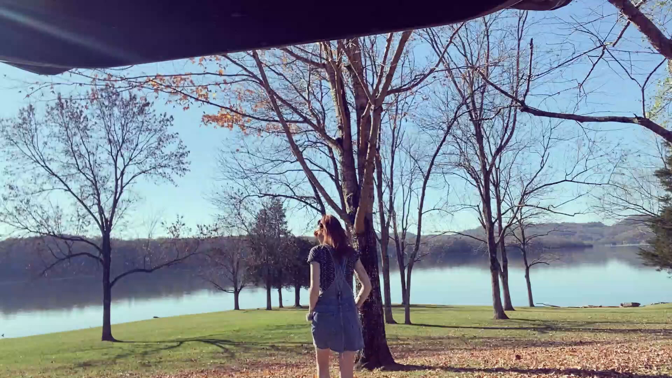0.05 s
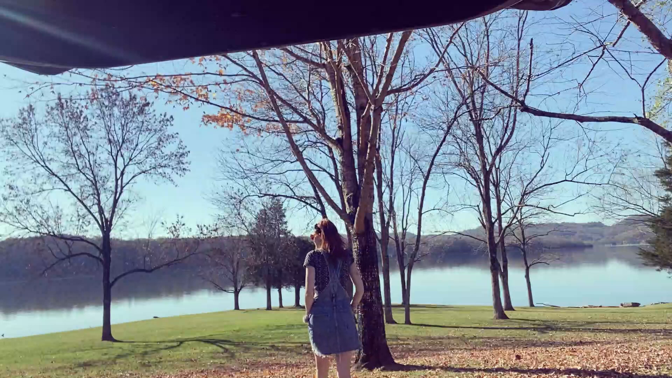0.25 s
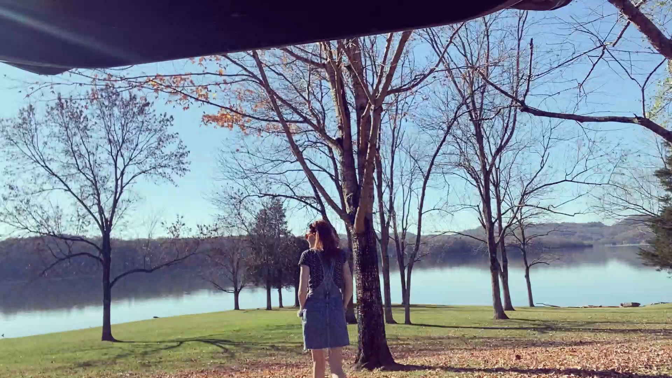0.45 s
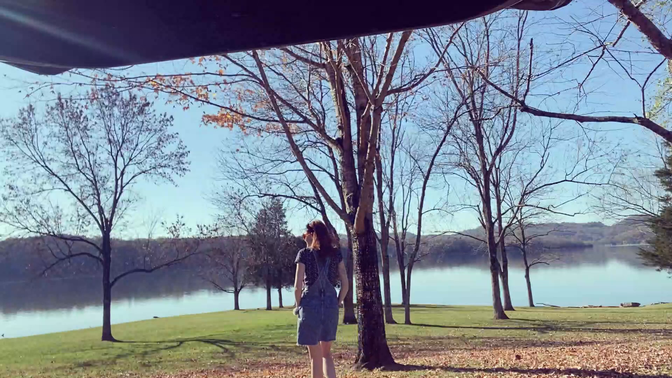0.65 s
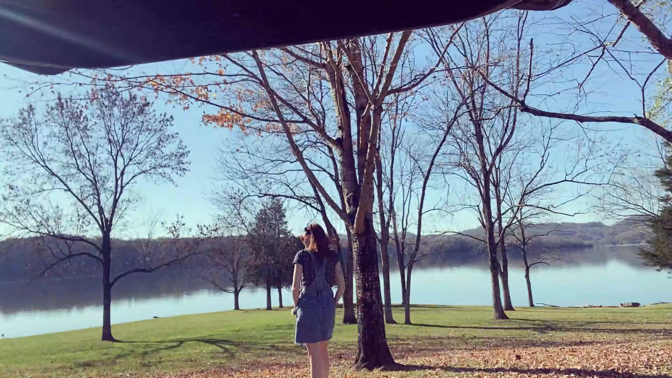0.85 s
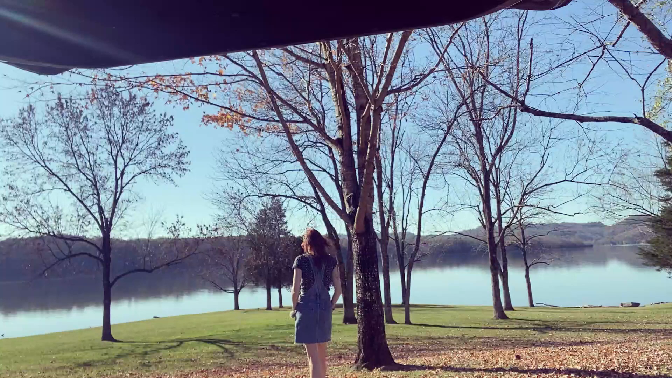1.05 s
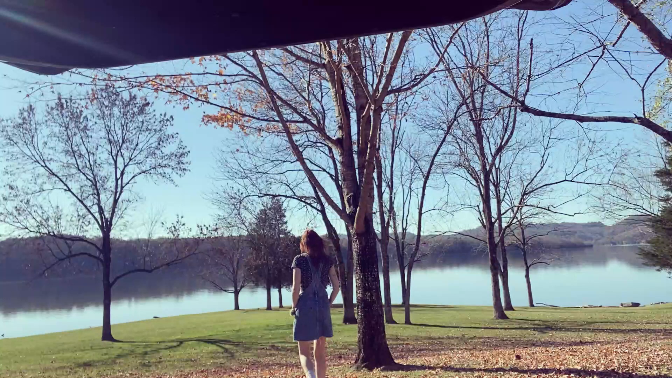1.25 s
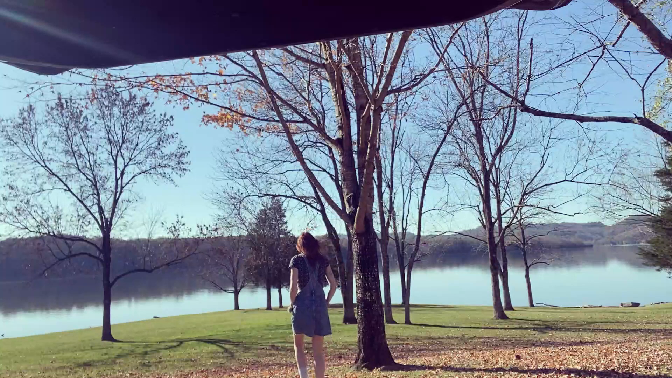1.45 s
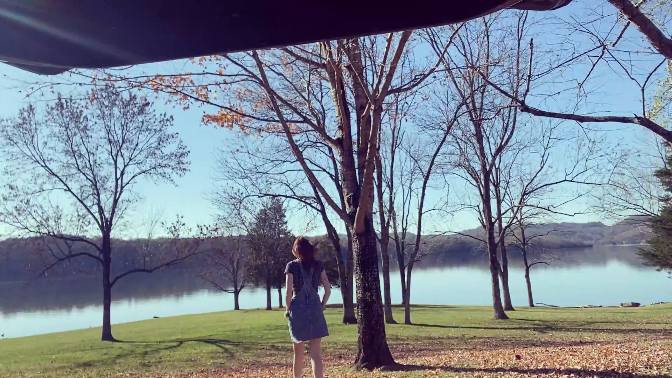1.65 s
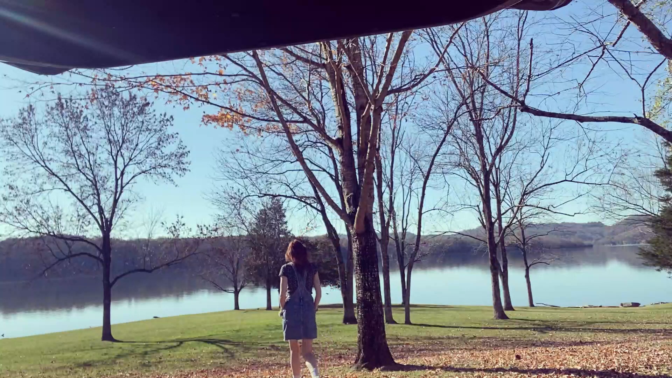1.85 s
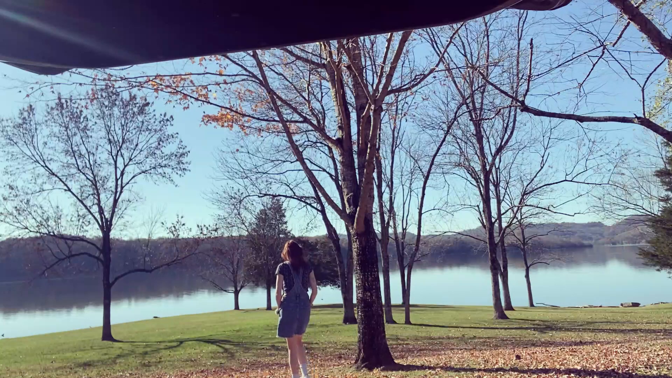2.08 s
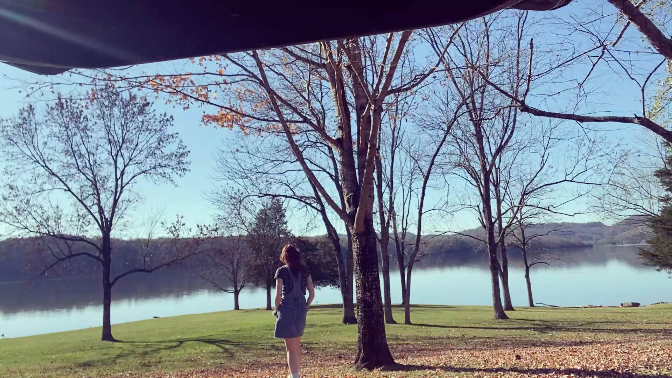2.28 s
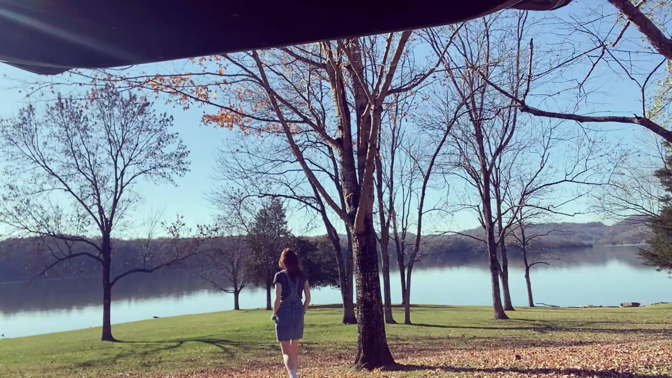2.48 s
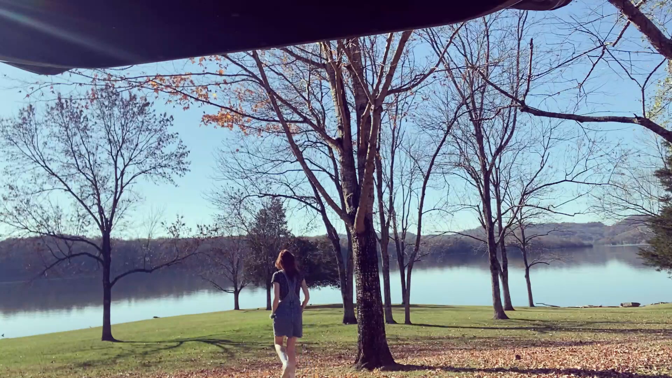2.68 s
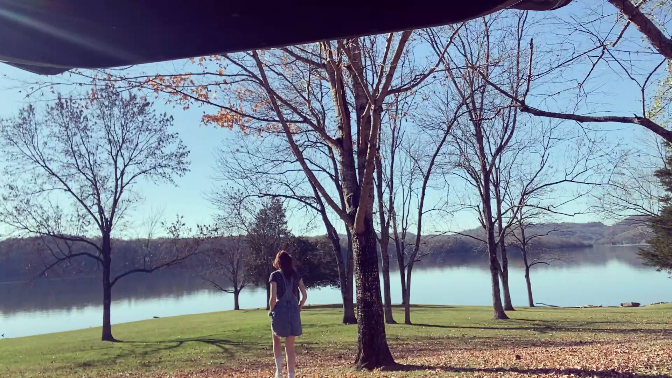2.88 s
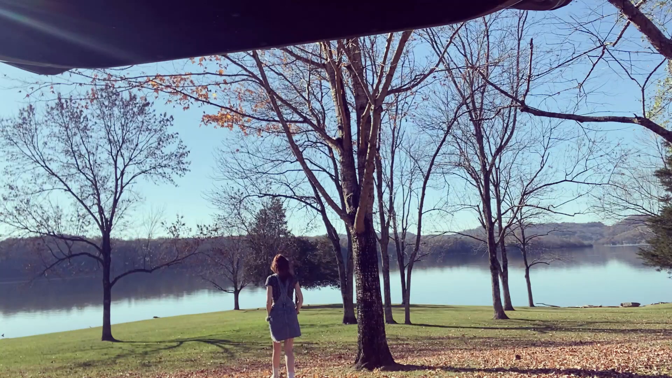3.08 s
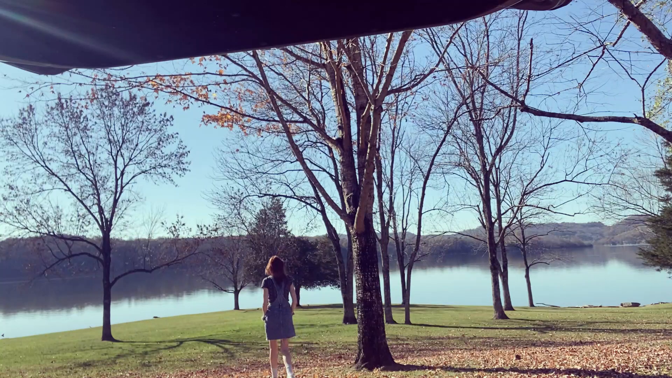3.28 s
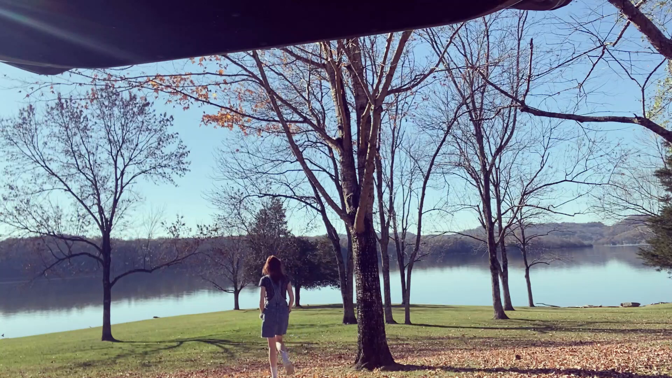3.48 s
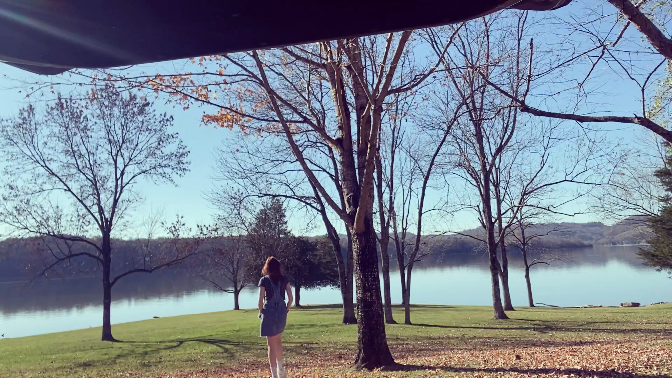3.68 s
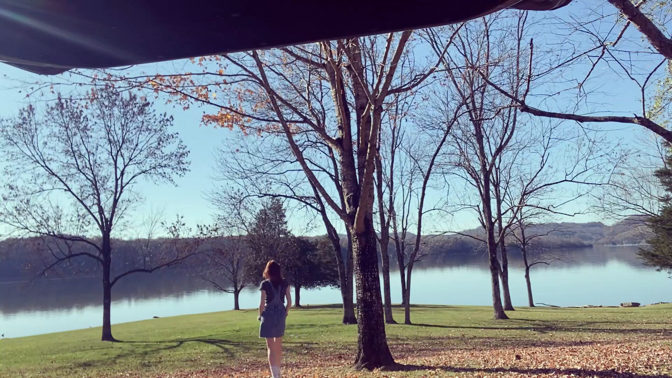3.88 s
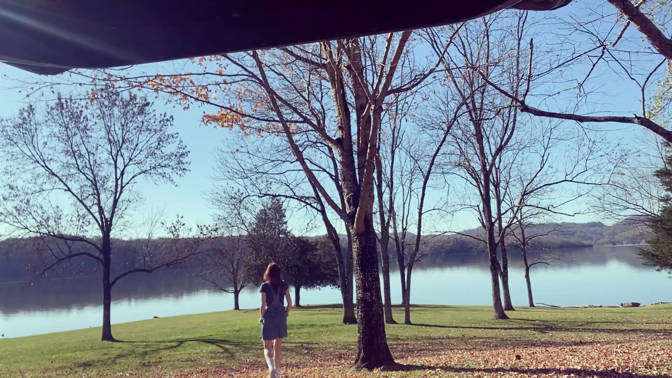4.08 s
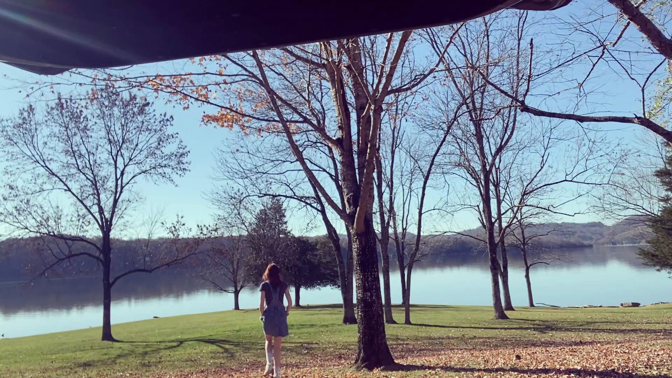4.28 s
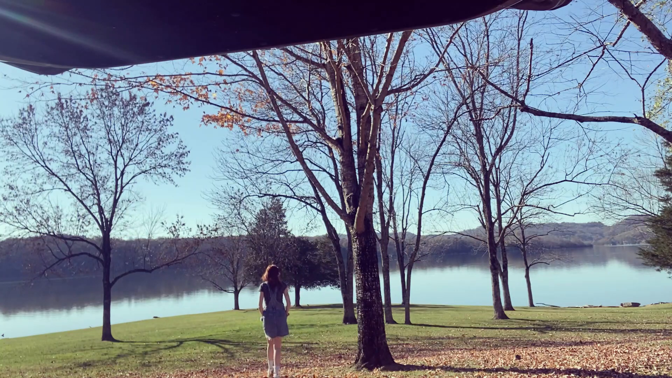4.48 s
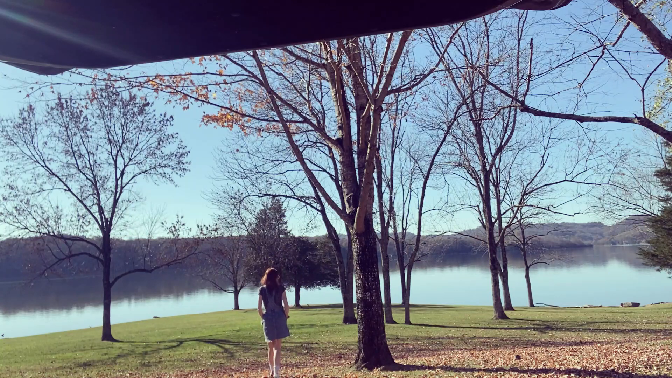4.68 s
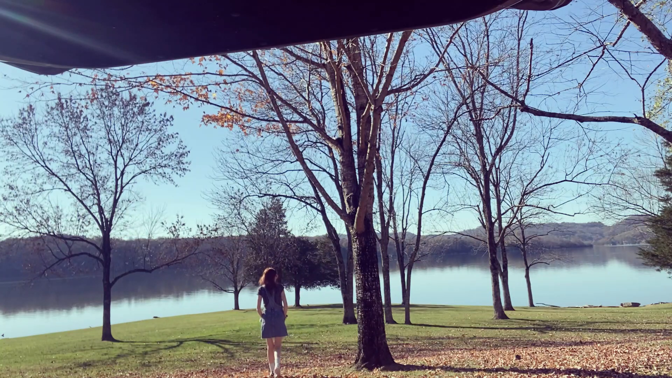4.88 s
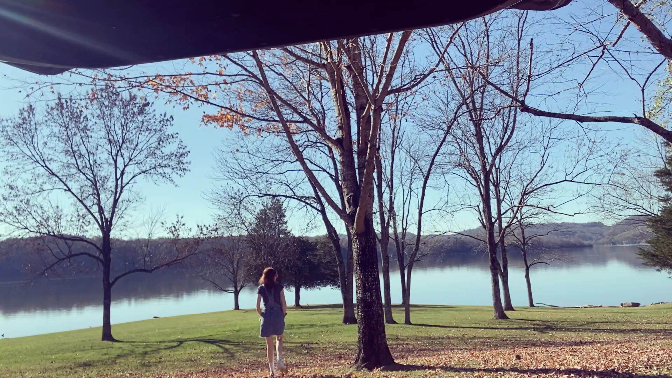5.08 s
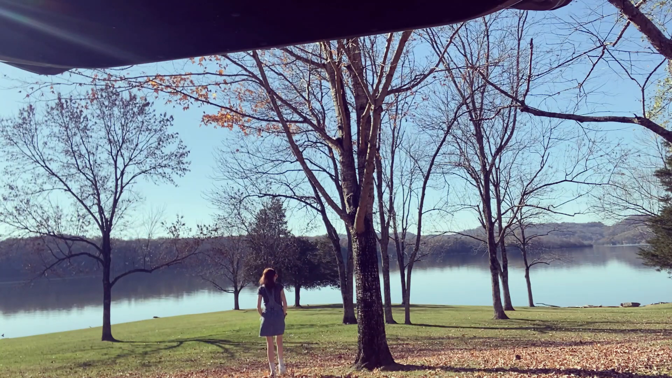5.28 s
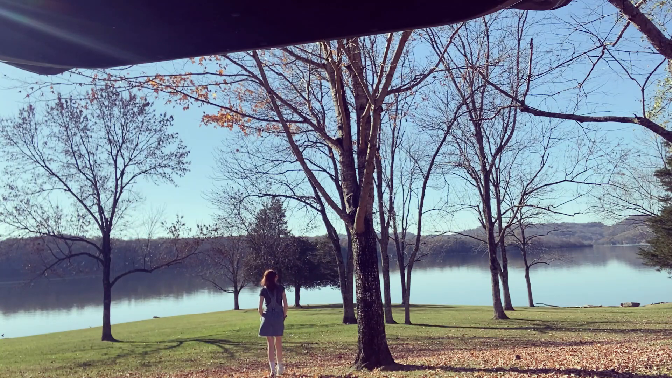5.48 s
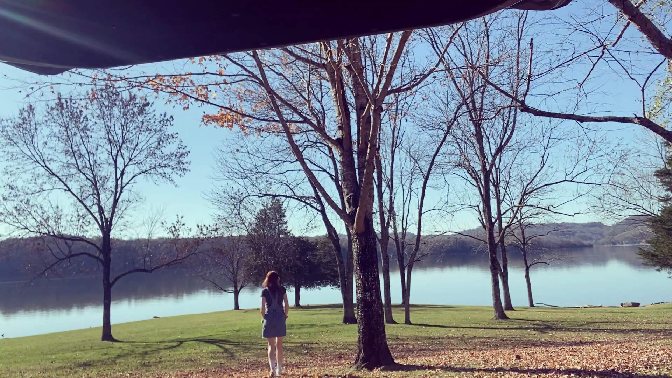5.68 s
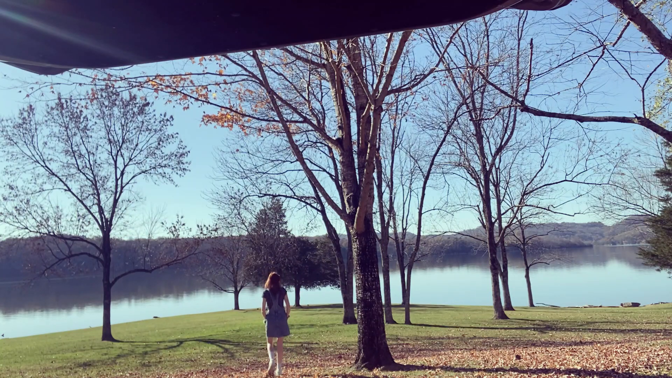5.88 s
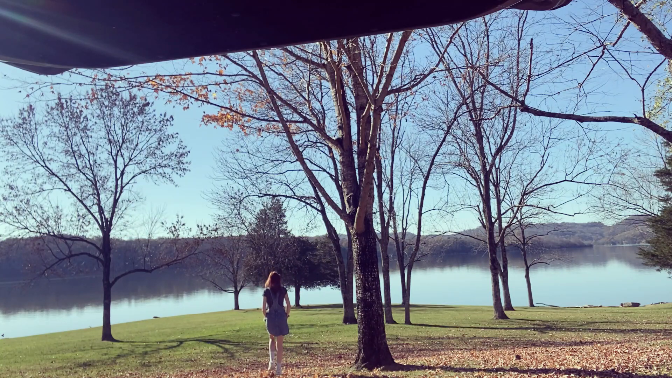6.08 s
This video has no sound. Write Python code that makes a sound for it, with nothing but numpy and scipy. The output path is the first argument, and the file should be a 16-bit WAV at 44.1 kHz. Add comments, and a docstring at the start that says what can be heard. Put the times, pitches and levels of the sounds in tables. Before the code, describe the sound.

A quiet open park by a lake, heard from a stationary phone in a car's open boot. A faint wavering low hum, soft rumble and barely perceptible rustle run throughout. A person walks away through dry leaves and grass. The first footfall bursts in at about 0.1 s, close, bright and crackly with crisp snaps, settling by 0.6. The second runs from 0.8 to 1.5, crunching most around 1.1. The third, 1.55 to 2.05, is strong and dense, with the sharpest snap near 1.75. Softer crunches follow from 2.1 to 2.9, 2.9 to 3.7 and 3.8 to 4.4, each swelling with weight and trailing into rustle. The seventh, 4.4 to 5.3, is thin and distant; the eighth, 5.55 to 6.1, is a faint scuff with a small snap near 5.95. Tiny hatch reflections give a slightly hollow colour that drifts as the walker recedes.

```python
"""Someone walks away through dry leaves and grass, heard by a phone in the open boot of a car.
Throughout: far hum (wavering tone and noise), low rumble and faint rustle (coloured noise).
From the start: eight footfalls of dense crackle (tiny decaying sines on noise), with single snaps (noise bursts).
In each footfall body swells as the foot takes the load; the raised hatch and boot edge add short echoes.
Towards the end the leaf colour has glided from near to far and the echo comb has drifted up."""
import sys
import numpy as np
from scipy import signal
from scipy.fft import rfft, irfft, next_fast_len
from scipy.io import wavfile
from scipy.ndimage import uniform_filter1d, map_coordinates

SR = 44100
rng = np.random.default_rng(int(sys.argv[2]) if len(sys.argv) > 2 else 0)


def generate_wav(sig):
    """Save sig (samples, or channels by samples) to the path in sys.argv[1] as 16-bit PCM at SR."""
    pcm = np.round(np.clip(np.atleast_2d(sig).T, -1, 1) * 32767).astype(np.int16)
    wavfile.write(sys.argv[1], SR, pcm)


N = 270896

# hum and rumble gains: time_s, hum_db, rumble_db
BACKGROUND_GAINS = [(0.0, -76, -73), (0.12, -57.5, -62), (0.26, -58, -67.5), (1.14, -62.5, -67),
                    (1.42, -69.5, -70.5), (1.61, -57.5, -60.5), (2.82, -65, -66.5), (3.18, -62.5, -61.5),
                    (3.81, -70.5, -65.5), (3.9, -60.5, -60.5), (5.56, -59, -67.5), (5.97, -58.5, -65),
                    (6.0, -50, -66), (6.14, -63, -70.5)]
# spectra, relative, scaled to rms 1 before the gain: freq_hz, density_db
HUM_SPECTRUM = [(20, -34), (45, -9), (64, 2.5), (90, -9), (130, -23), (200, -63)]
RUMBLE_SPECTRUM = [(20, -39), (60, -4.5), (150, -1), (274, -12.5), (500, -34.5), (700, -77)]
RUSTLE_SPECTRUM = [(200, -36), (300, 5), (700, -3.5), (1800, -8.5), (3700, -5.5), (6500, -6), (9000, -3),
                   (12000, -12.5), (15500, -7)]

# crackle gain, one list per footfall from landing to settling: time_s, crackle_db
FOOTFALL_CRACKLE = [
    [(.066, -85), (.076, -36), (.105, -49), (.17, -39), (.22, -57), (.26, -53.5), (.29, -49), (.32, -50.5),
     (.385, -46), (.42, -62), (.49, -54), (.58, -59.5), (.66, -77)],
    [(.76, -69), (.78, -58), (.83, -50.5), (.89, -52.5), (1.01, -50.5), (1.08, -40.5), (1.14, -50),
     (1.18, -48.5), (1.26, -57), (1.29, -49.5), (1.38, -69), (1.43, -58.5), (1.52, -66)],
    [(1.54, -64.5), (1.56, -50), (1.6, -44), (1.655, -36), (1.69, -42), (1.77, -38.5), (1.85, -49),
     (1.95, -39), (2.0, -45.5), (2.05, -62.5)],
    [(2.06, -69), (2.1, -53), (2.19, -51), (2.24, -47.5), (2.37, -51.5), (2.53, -42), (2.63, -44),
     (2.75, -60.5), (2.89, -65.5)],
    [(2.9, -64), (2.912, -52), (2.95, -47), (3.03, -41.5), (3.09, -47.5), (3.18, -44), (3.33, -48),
     (3.42, -43), (3.52, -62), (3.7, -70)],
    [(3.75, -67), (3.86, -54.5), (3.92, -55.5), (3.96, -47.5), (4.09, -48), (4.24, -44), (4.34, -59),
     (4.41, -63.5)],
    [(4.415, -69), (4.435, -53.5), (4.51, -48), (4.62, -58.5), (4.72, -53), (4.84, -59), (4.88, -54.5),
     (4.99, -48), (5.08, -55), (5.2, -73.5), (5.27, -66), (5.45, -81)],
    [(5.53, -78), (5.58, -62), (5.62, -60), (5.66, -56), (5.83, -60), (5.96, -54), (6.03, -61.5),
     (6.11, -82)],
]
# load per footfall: full_load_s, body_db (re crackle, at full load), fine_db (re crackle)
FOOTFALL_LOADS = [(.3, -8.5, -3), (1.1, -6.5, -6), (1.8, -8, -3.5), (2.5, -6, -8), (3.22, -5.5, -8),
                  (4.0, -5, -10.5), (4.6, -4.5, -8), (5.67, -4.5, -6)]
# single leaf and stalk breaks, gain before ground colour: start_s, level_db, pitch_hz
SNAPS = [(0.0473, -47, 2840), (0.0704, -33, 6130), (0.1211, -28.5, 8060), (0.1655, -26.5, 8210),
         (0.2678, -34.5, 7600), (0.2813, -29.5, 8580), (0.576, -41, 7560), (0.609, -44.5, 7620),
         (0.7033, -45, 6830), (0.7754, -37.5, 3400), (0.8066, -40, 7960), (0.8869, -38, 7120),
         (0.9325, -36, 4450), (0.9762, -34, 6300), (1.0345, -36, 6100), (1.1164, -29, 4480),
         (1.2815, -32.5, 6900), (1.4287, -45, 6590), (1.5135, -40, 5400), (1.5534, -34, 6410),
         (1.6494, -27, 5600), (1.7125, -28.5, 6920), (1.7524, -21.5, 9250), (1.7694, -32.5, 4610),
         (1.9964, -32, 3320), (2.0752, -36.5, 5800), (2.0906, -32.5, 4330), (2.142, -30, 5760),
         (2.5242, -32, 3670), (2.5654, -31, 4410), (2.7067, -36.5, 9130), (2.8134, -49, 3680),
         (2.8489, -44, 3600), (2.9064, -38, 5970), (2.9183, -32, 6330), (2.9786, -29.5, 4040),
         (3.1672, -34, 3760), (3.4164, -33, 3890), (3.6301, -43.5, 8900), (3.6985, -51.5, 3700),
         (3.7434, -47.5, 8420), (3.9434, -43, 3800), (4.3705, -41, 4080), (4.4283, -40, 4020),
         (4.5685, -39, 4030), (4.6337, -40, 3590), (4.7446, -42, 3670), (4.8778, -38.5, 4150),
         (5.2051, -55, 4060), (5.3727, -54, 3730), (5.4056, -55, 4580), (5.5483, -50, 8960),
         (5.9539, -37, 7870)]
# leaf colour reaching the boot from near and from far: freq_hz, gain_db
NEAR_COLOUR = [(150, -24), (300, -4), (560, -23), (800, -3.5), (1150, -3), (1350, -10.5), (1850, -2.5),
               (2300, -9), (3100, -7.5), (3600, -9), (4200, -8.5), (6000, -1), (9500, -4), (15500, -3)]
FAR_COLOUR = [(150, -12.5), (300, -5.5), (450, -1), (600, -16.5), (860, -4.5), (1150, -14), (1500, -15),
              (2400, -7.5), (3100, -3.5), (3750, -2.5), (6500, -6.5), (9300, -3.5), (12000, -6),
              (15500, -7)]
# walker receding: time_s, distance_m
WALK = [(0, 3.05), (1.7, 5.2), (3.6, 8.3), (4.6, 9.5), (6.14, 10.6)]

# hatch echoes: extra_delay_ms (after the first), gain_db, sign
HATCH_ECHOES = [(0, -12, 1), (.06, -17, -1), (.2, -18, 1)]
# boot edge echo, inverted: delay_ms, gain_db
SILL_ECHO = (.385, -16)
# likeness of the two ports for the feet: freq_hz, likeness (0 to 1)
FEET_LIKENESS = [(300, .92), (600, .4), (900, .93), (2200, .72), (3700, .93), (5600, .45), (6800, .85),
                 (8000, .97), (15000, .96)]
# phase by which the left port leads: freq_hz, lead_rad
LEFT_LEAD = [(400, 0), (620, -1.8), (900, -.1), (5000, .3), (6600, -.9), (7900, 0), (10550, 3.14),
             (13050, 6.28), (15200, 9.42)]
# left port over right: freq_hz, left_over_right_db
LEFT_BALANCE = [(300, -0.5), (1000, -1.5), (4000, -1.5), (6200, -3), (7200, -0.5)]

# body at first touch, once landed, and as the leaves settle, re full load
TOUCH_DB, LANDED_DB, SETTLING_DB = -17.5, -4.5, -10
LANDING_S, EDGE_S = 0.067, 0.026  # first touch to landed; fade outside each footfall
SNAP_T60_S, CRACK_T60_S, SNAP_RISE_S = 0.035, 0.0045, 0.00041
NEAR_M, FAR_GROWTH = 3.0, 1.406  # all near colour at this distance; rate of the far colour taking over
HATCH_FAR_MS, HATCH_MS_M = 0.62, 1.5  # delay from far away; extra delay at 1 m, falling as 1 / distance
BAND_LIMIT_HZ = 15550


def amp(db):
    """Decibels to gain."""
    return 10 ** (np.asarray(db) / 20)


def unit(x):
    """Scale to rms 1."""
    return x / np.sqrt(np.mean(x ** 2) + 1e-20)


def along(points, hz):
    """Interpolate (freq_hz, value) points on a log frequency axis."""
    freq_hz, value = np.transpose(points)
    return np.interp(np.log(hz + 1), np.log(freq_hz + 1), value)


def curves(rows):
    """One per-sample curve for each column after the time."""
    time_s, *columns = np.transpose(rows)
    return [np.interp(np.arange(N) / SR, time_s, column) for column in columns]


def wobble(rate_hz):
    """Smooth random curve through rate_hz knots a second."""
    knots = rng.standard_normal(int(N * rate_hz / SR) + 4)
    return map_coordinates(knots, [np.arange(N) * rate_hz / SR])


def filtered(x, response):
    """Multiply the spectrum of x by a response of frequency."""
    size = next_fast_len(N + SR // 4)
    spectrum = rfft(x, size) * response(np.fft.rfftfreq(size, 1 / SR))
    return irfft(spectrum, size)[..., :N]


def ports(pair, likeness):
    """Mix a shared and an unshared sound to the likeness, lead and balance of the two microphone ports."""
    def angle(hz):
        return np.arccos(np.clip(along(likeness, hz), 0, 1)) / 2

    def left_half(hz):
        return amp(along(LEFT_BALANCE, hz) / 2) * np.exp(0.5j * along(LEFT_LEAD, hz))

    mid, side = filtered(pair, lambda hz: np.array([np.cos(angle(hz)), np.sin(angle(hz))]))
    left_right = np.array([mid + side, mid - side])
    return filtered(left_right, lambda hz: np.array([left_half(hz), 1 / left_half(hz)]))


def patches(x, depth_db):
    """Each handful of leaves has its own colour: a random gain over time and pitch."""
    cells = signal.stft(x, nperseg=256)[2]
    field = rng.standard_normal(cells.shape[1:])
    field = uniform_filter1d(field, size=6, axis=0)  # over pitch
    field = uniform_filter1d(field, size=8, axis=1)  # over time
    return signal.istft(cells * amp(depth_db * unit(field)), nperseg=256)[1][:, :N]


def coloured_noise(spectrum):
    """Two independent channels of noise shaped to a spectrum."""
    white = rng.standard_normal((2, N))
    return unit(filtered(white, lambda hz: amp(along(spectrum, hz))))


def background():
    """Far hum, part wavering tone and part lumpy noise, a broad rumble and a faint wide rustle."""
    hum_db, rumble_db = curves(BACKGROUND_GAINS)
    tone_hz = 65 + 6 * wobble(12)
    tone = np.sin(np.cumsum(tone_hz) * 2 * np.pi / SR)
    hum_noise = ports(coloured_noise(HUM_SPECTRUM), [(60, 0.92)])
    hum = amp(hum_db) * (0.9 * tone + 0.96 * hum_noise)
    rumble_noise = ports(coloured_noise(RUMBLE_SPECTRUM), [(60, 0.67), (160, 0.7), (450, 0.22)])
    rumble = amp(rumble_db) * rumble_noise
    rustle_db = -70.0 + 1.8 * wobble(4.91)
    rustle = amp(rustle_db) * patches(coloured_noise(RUSTLE_SPECTRUM), depth_db=2.5)
    return hum + rumble + ports(rustle, [(1500, 0.059), (4000, 0.075), (8000, 1.0)])


def car(x):
    """Short echoes off the car comb the sound into bands that drift up as the walker recedes."""
    def delayed(delay_ms):
        position = np.arange(N) - delay_ms * SR / 1000
        return np.array([map_coordinates(channel, [position]) for channel in x])

    hatch_ms = HATCH_FAR_MS + HATCH_MS_M / curves(WALK)[0]
    hatch = sum(sign * amp(db) * delayed(hatch_ms + extra_ms) for extra_ms, db, sign in HATCH_ECHOES)
    sill_ms, sill_db = SILL_ECHO
    return x + hatch - amp(sill_db) * delayed(sill_ms)


def ground(x):
    """Glide the colour from near to far as the walker recedes."""
    far = np.clip(FAR_GROWTH * (1 - NEAR_M / curves(WALK)[0]), 0, 1)
    near_x = filtered(x, lambda hz: amp(along(NEAR_COLOUR, hz)))
    far_x = filtered(x, lambda hz: amp(along(FAR_COLOUR, hz)))
    return (1 - far) * near_x + far * far_x


def snaps():
    """Single breaks: a sharp crack and a fast-dying burst, half broad, half around the leaf's own pitch."""
    out, t = np.zeros((2, N + SR)), np.arange(SR // 8) / SR
    for start_s, level_db, pitch_hz in SNAPS:
        noise = rng.standard_normal((2, 2, len(t)))
        ring = signal.lfilter(*signal.iirpeak(pitch_hz, 2.5, SR), noise[0])
        burst = 0.4 * noise[1] + 0.49 * unit(ring)
        tail = amp(level_db - 60 * t / SNAP_T60_S)
        crack = amp(level_db + 3 - 60 * t / CRACK_T60_S)
        rise = 1 - np.exp(-t / SNAP_RISE_S)
        out[:, round(start_s * SR):][:, :len(t)] += (tail + crack) * rise * burst
    return out[:, :N]


def crackle(cycles, scatter_db, count=36000, size=128):
    """Tiny breaks decaying over a few cycles, all pitches alike, a few far louder than the rest."""
    when, pitch, luck = rng.random((count, 3)).T
    hz, t = (700 + 15500 * pitch)[:, None], np.arange(size) / SR
    gain = amp(-scatter_db * np.log(luck + 1e-4))[:, None] * np.sqrt(hz)  # sqrt evens out grain energy
    grains = gain * np.sin(2 * np.pi * hz * t) * np.exp(-t * hz / cycles)
    index = (when * N).astype(int)[:, None] + np.arange(size)
    return unit(np.bincount(index.ravel(), grains.ravel(), N + size)[:N])


def surges(rate_hz, scatter_db, fade_s):
    """Leaves give way at random moments: a sudden rise, then an exponential fade."""
    when, luck = rng.random((round(rate_hz * N / SR), 2)).T
    kicks = np.bincount((when * N).astype(int), amp(-scatter_db * np.log(luck + 1e-3)), N)
    return signal.lfilter([1], [1, -np.exp(-1 / (fade_s * SR))], kicks)


def footfalls():
    """Gains of the crackle, of the body that swells as the foot takes the load, and of the finest crackle."""
    t, gains = np.arange(N) / SR, np.zeros((3, N))
    for rows, (full_load_s, body_db, fine_db) in zip(FOOTFALL_CRACKLE, FOOTFALL_LOADS):
        time_s, crackle_db = np.transpose(rows)
        start_s, end_s = time_s[0], time_s[-1]
        edge = np.clip(1 + np.minimum(t - start_s, end_s - t) / EDGE_S, 0, 1)
        load_s = [start_s, start_s + LANDING_S, full_load_s, end_s]
        load_db = np.interp(t, load_s, [TOUCH_DB, LANDED_DB, 0, SETTLING_DB])
        relative_db = np.array([0 * t, body_db + load_db, fine_db + 0 * t])
        gains += edge * amp(np.interp(t, time_s, crackle_db) + relative_db)
    return gains


def feet():
    """Crackle on a swish, in surges; the foot's weight adds body, brittle leaves add fine crackle."""
    crackle_gain, body_gain, fine_gain = footfalls()
    swish = rng.standard_normal((2, N))
    shared = crackle(cycles=3.35, scatter_db=2.0) + 1.44 * swish[0]
    leaves = np.array([shared, 2.09 * swish[1]])
    drag = 0.5 + 0.19 * surges(rate_hz=32, scatter_db=2.0, fade_s=0.0067)
    clumps = drag * amp(0.85 * wobble(30) + 0.27 * wobble(300))
    leaves = ground(patches(clumps * leaves, depth_db=1.5))
    body = filtered(leaves, lambda hz: 1 / (1 + (hz / 1700) ** 4))
    fine = filtered(leaves, lambda hz: 1 / (1 + (10500 / (hz + 1)) ** 8))
    middle = leaves - body - fine
    bed = crackle_gain * unit(middle) + body_gain * unit(body) + fine_gain * unit(fine)
    return bed + ground(snaps())


def scene():
    """Feet with car echoes, over the background, at the two ports."""
    return background() + ports(car(feet()), FEET_LIKENESS)


def record(dry):
    """The phone keeps nothing above its band limit."""
    return filtered(dry, lambda hz: hz < BAND_LIMIT_HZ)


dry = scene()
out = record(dry)
generate_wav(out)
```